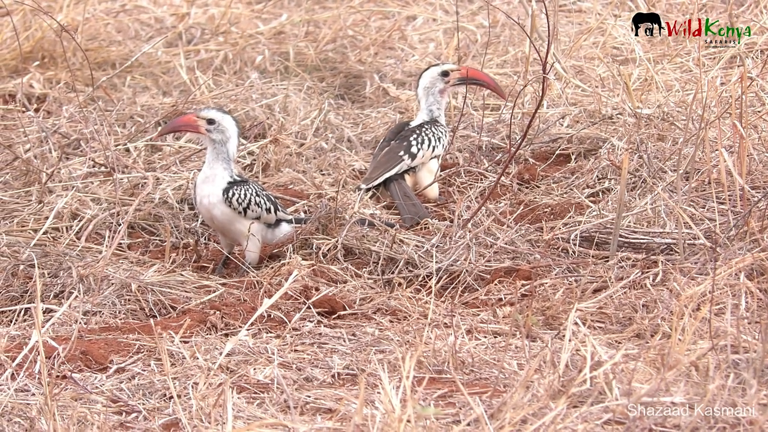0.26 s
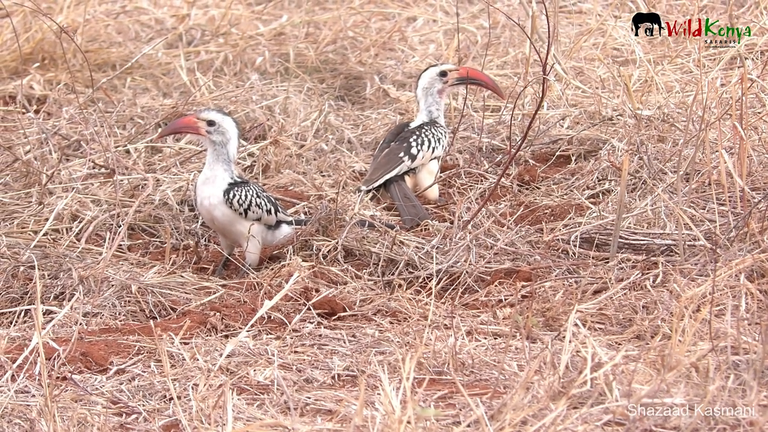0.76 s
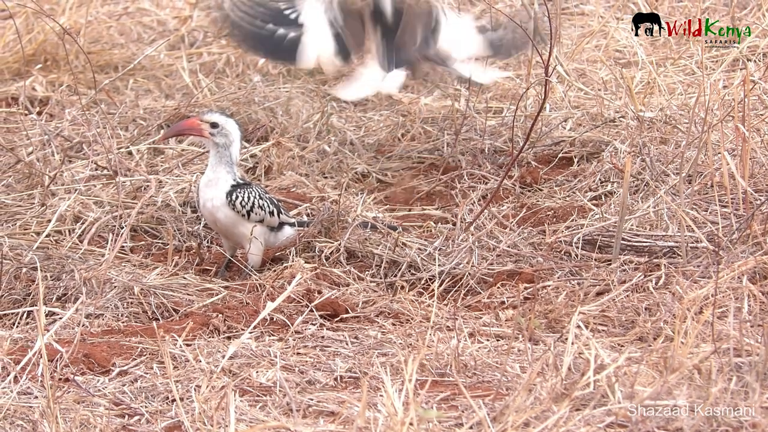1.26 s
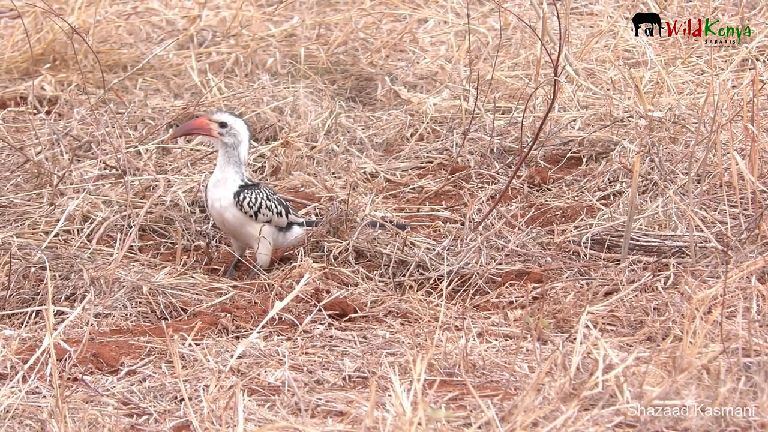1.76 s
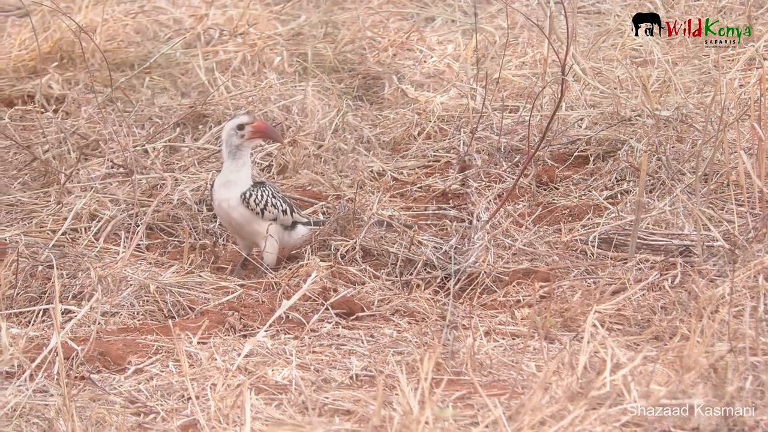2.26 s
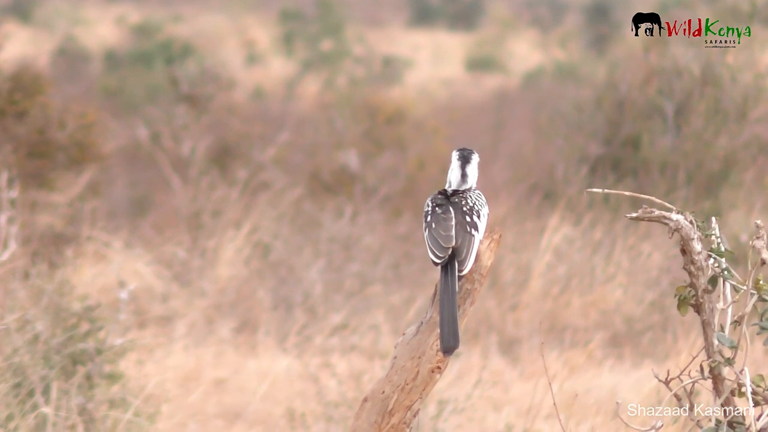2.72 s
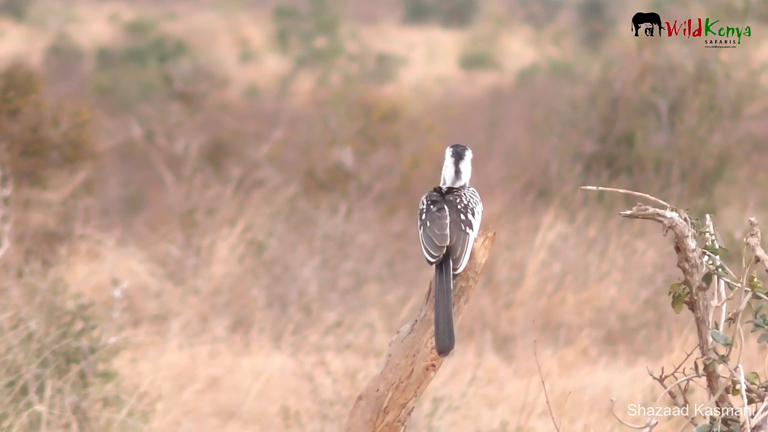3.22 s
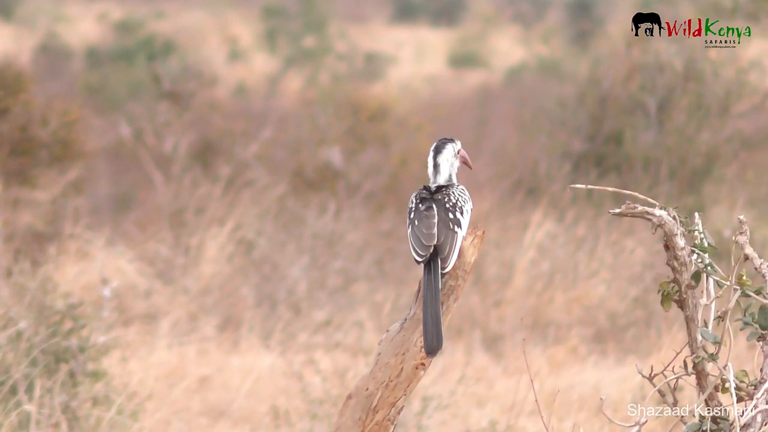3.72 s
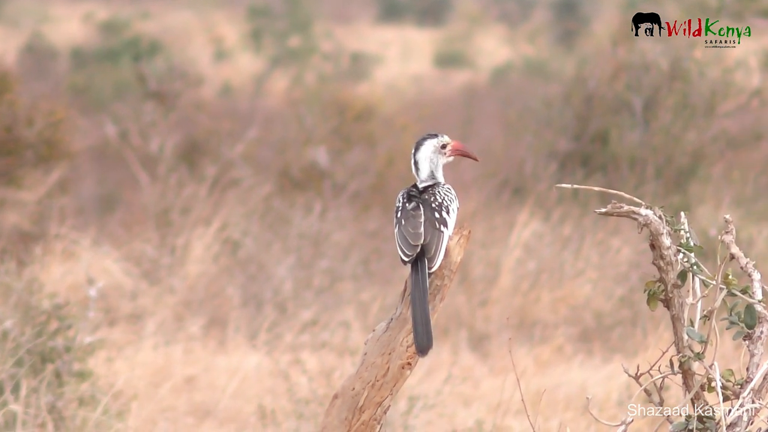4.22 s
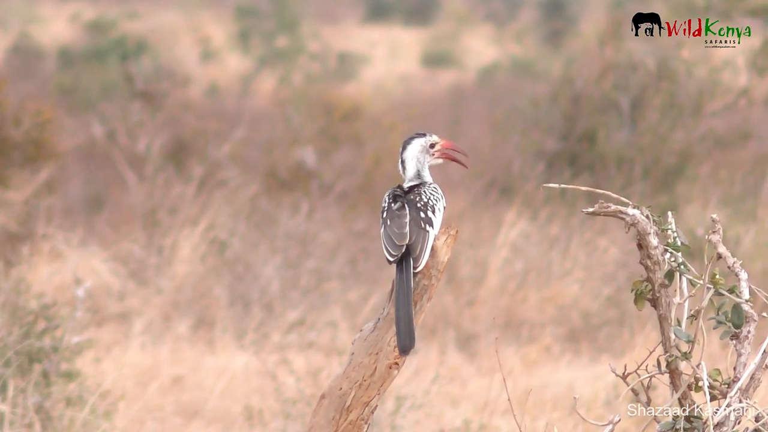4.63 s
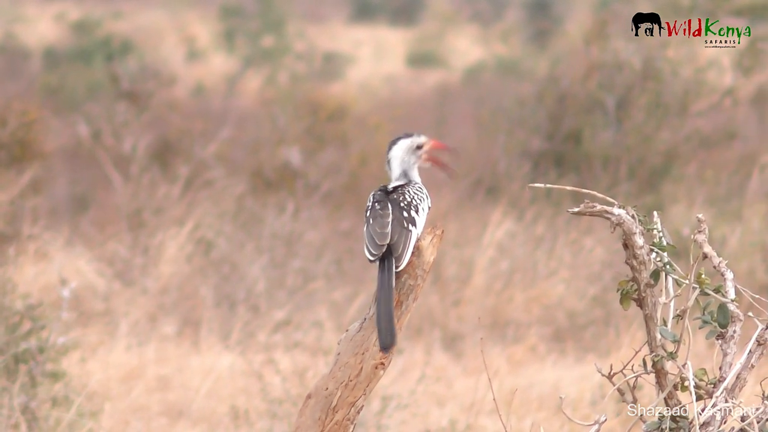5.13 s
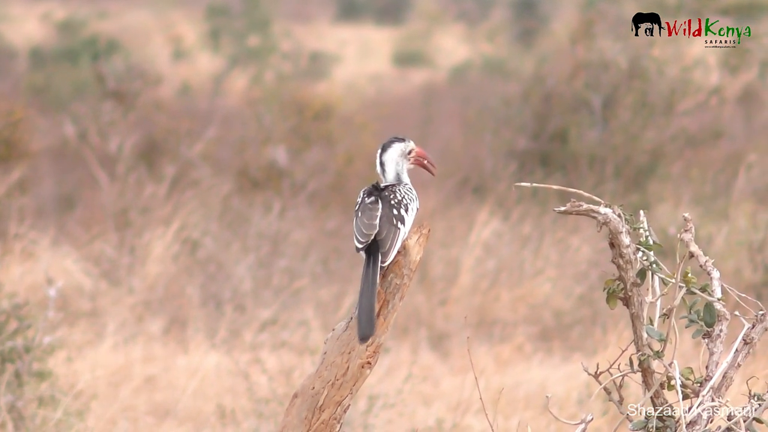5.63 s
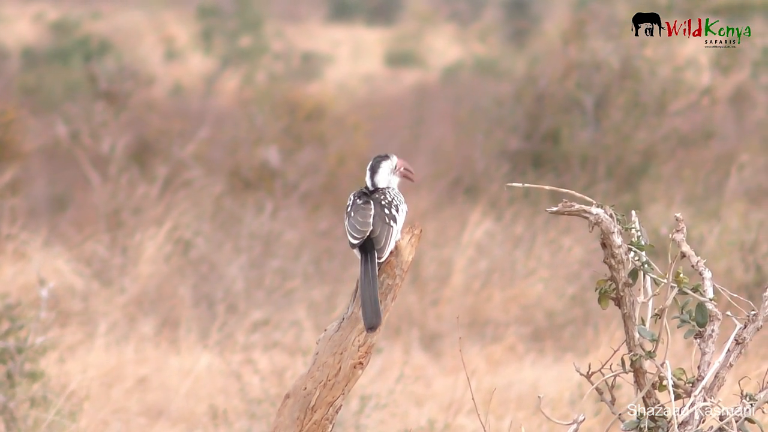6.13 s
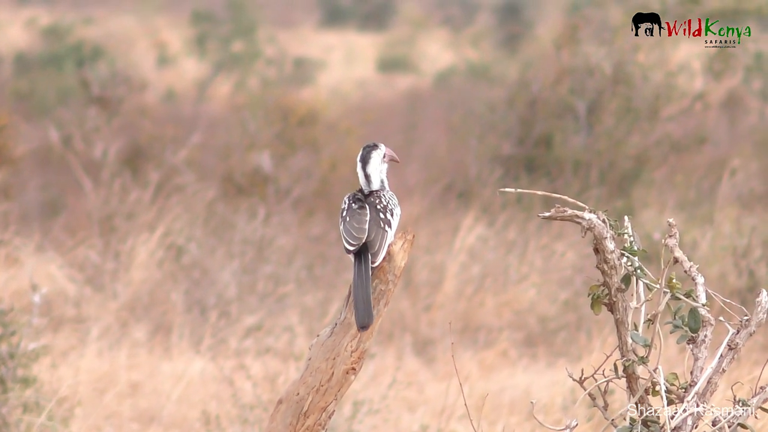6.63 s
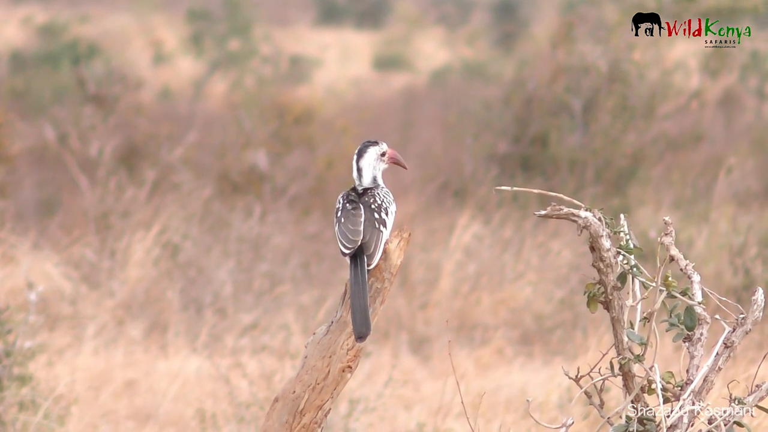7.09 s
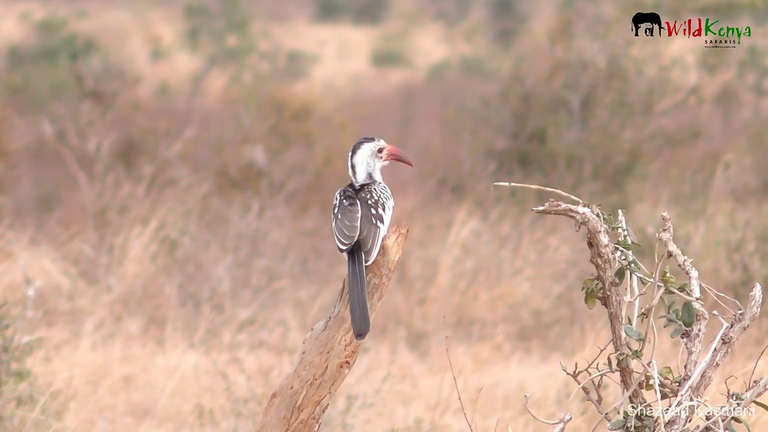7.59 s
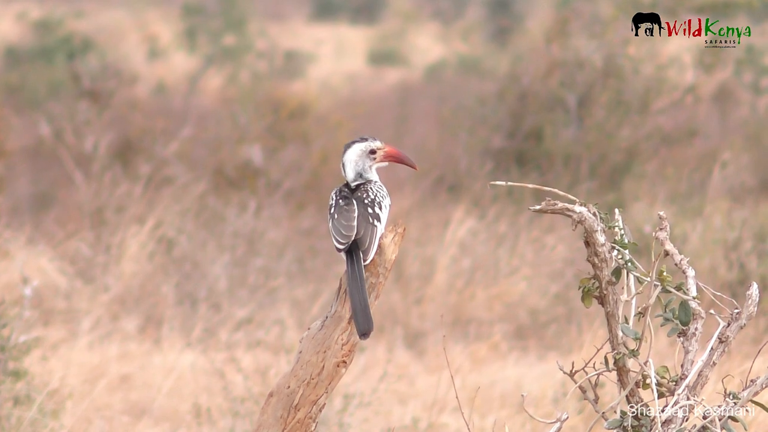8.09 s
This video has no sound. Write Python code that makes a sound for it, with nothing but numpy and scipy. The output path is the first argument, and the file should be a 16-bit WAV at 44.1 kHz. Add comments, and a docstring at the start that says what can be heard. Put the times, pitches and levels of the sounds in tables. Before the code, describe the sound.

A large-billed bird calls close and central in open dry bush, its hoarse gliding notes briefly echoed by grass and twigs. A trilled squawk and drawn-out rasp lead to dense cackling chatter with high squeaks, ending suddenly past the middle. Then it is sparse: gentle drooping peeps, far whistles, a low distant honk, and a single late squawk. Wind rumbles and buffets the microphone throughout, strongest early.

```python
"""Wind buffets the microphone throughout, over a low rush and a faint hiss, and thin whistles come from afar.
Close by in dry savanna bush a bird chatters a fast run of harsh, swooping, trilled notes and stops;
soft peeps follow, and one more falling call; another distant bird honks twice. Voices are gliding harmonics
coloured by the beak, roughened by noise; the two sides of the syrinx sometimes sound at once.
Wind and air are coloured noise with moving levels; grass and scrub scatter a short echo of the birds."""
import sys
import numpy as np
from scipy import signal
from scipy.fft import rfft, irfft
from scipy.io import wavfile
from scipy.ndimage import uniform_filter1d, minimum_filter1d

SR = 44100
rng = np.random.default_rng(int(sys.argv[2]) if len(sys.argv) > 2 else 0)


def int16_out(signal):
    """Quantize to a 16-bit WAV file."""
    q = np.round(np.clip(np.atleast_2d(signal).T, -1, 1) * 32767)
    wavfile.write(sys.argv[1], SR, q.astype(np.int16))


N = 368468
TIME = np.arange(N) / SR
BIN_HZ = np.arange(N // 2 + 1) * SR / N
SIDES = np.array([[1], [-1]])  # opposite sign left and right
TOP_HZ = 15750  # nothing is kept above this

# What throat and beak let through: (frequency [Hz], gain [dB])
BEAK = [(600, -16), (850, -8.5), (1200, -8), (1600, -5), (2200, -1), (5500, -1), (7000, -12), (8000, -19),
        (9500, -26.5), (14000, -31.5), (16000, -56)]


def undb(db):
    """Decibels to gain."""
    return 10 ** (np.asarray(db) / 20)


def curves(rows):
    """Each column of a table, joined by straight lines in time."""
    s, *columns = np.transpose(rows)
    return [np.interp(TIME, s, column) for column in columns]


def gain_at(hz, colour):
    """Gain of a short spectrum at the given frequencies, joined along log frequency."""
    points, db = np.transpose(colour)
    return undb(np.interp(np.log(np.maximum(hz, 1)), np.log(points), db))


def noise(colour):
    """Coloured noise of unit power."""
    y = irfft(rfft(rng.standard_normal(N)) * gain_at(BIN_HZ, colour), N)
    return y / y.std()


def walk(rate):
    """Smooth chance of unit spread that changes about rate times a second."""
    size = max(int(SR / rate), 1)
    steps = np.repeat(rng.standard_normal(N // size + 1), size)[:N]
    y = uniform_filter1d(steps, size)
    return y / y.std()


def steady(y, seconds):
    """Noise with its slow swings of level evened out."""
    power = uniform_filter1d(y ** 2, int(seconds * SR))
    return y / np.sqrt(power + 1e-6)


def wind(swell_gain_db=1.0):
    """Eddies press on the microphone: slow swells and quicker buffets, both lifted by gusts."""
    # Wind at the microphone before gusts and trims: (time [s], pressure swell [dB], buffeting [dB])
    wind_levels = [(0, -13, -30.5), (.24, -17, -29), (.32, -3.5, -21), (.55, -14, -23), (.75, -15, -32),
                   (.86, -9, -21.5), (1.2, -13, -32), (1.6, -16.5, -31), (2.35, -16, -31),
                   (2.75, -15.5, -31), (3.0, -21.5, -38), (3.4, -18, -43.5), (3.7, -19, -28.5),
                   (4.5, -17.5, -32.5), (5.25, -21, -38.5), (5.85, -20.5, -34.5), (6.35, -24, -39.5),
                   (6.8, -17, -35), (7.55, -20, -34.5), (7.9, -15, -36), (8.36, -20, -32)]
    # Single gusts on top: (time of crest [s], half width at 1/e of the dB rise [s], rise of the buffeting [dB])
    gusts = [(.53, 0.046, 9), (.88, 0.069, 7), (1.29, 0.035, 11), (2.4, .04, 3), (2.57, .035, 3),
             (3.52, 0.048, 13), (5.78, 0.037, 12), (5.96, 0.041, 15.5), (7.25, .07, 9),
             (7.686, 0.011, 15.5), (7.79, 0.031, 17.5)]
    # Spectra of the slow swell and the quicker buffets: (frequency [Hz], relative level [dB])
    swell_colour = [(3, -14), (8, -1), (14, 2), (25, 1), (40, -8.5), (60, -14.5), (90, -34.5), (200, -106)]
    buffet_colour = [(35, -17.5), (62, 2.5), (80, 0), (120, -11), (200, -23), (400, -47.5), (1000, -78)]
    gust_swell = 0.38  # share of a gust's rise that the slow pressure follows

    swell_db, buffet_db = curves(wind_levels)
    gust_db = sum(db * np.exp(-((TIME - s) / width) ** 2) for s, width, db in gusts)
    swell = steady(steady(noise(swell_colour), 0.1056), 0.0686)
    swell = swell * undb(swell_db + gust_swell * gust_db + swell_gain_db)
    buffets = steady(noise(buffet_colour), 0.0497)
    buffets = buffets * undb(buffet_db + gust_db + 3.1 * walk(14))
    return swell + buffets


def air(rush_gain_db=3, hiss_gain_db=4.0, side_db=-5):
    """A low rush over the plain and a thin hiss that differs a little between the channels."""
    # Background before the two gains: (time [s], low rush [dB], hiss [dB])
    air_levels = [(0, -46, -60), (.45, -45.5, -60), (1.35, -51.5, -68), (2.0, -53, -70), (3.3, -54, -71),
                  (4.6, -53, -70), (5.3, -54, -70.5), (6.1, -55.5, -71.5), (6.6, -54, -70.5),
                  (7.2, -51, -69), (7.9, -48.5, -65), (8.36, -47.5, -63)]
    # Spectra of rush and hiss: (frequency [Hz], relative level [dB])
    rush_colour = [(100, -11.5), (250, 1), (400, -2.5), (700, -8.5), (1200, -16), (2500, -23.5),
                   (5000, -30), (10000, -105)]
    hiss_colour = [(500, 4), (2000, -2.5), (4000, 6), (8000, 6), (12000, 3), (15500, 0)]

    rush_db, hiss_db = curves(air_levels)
    rush = noise(rush_colour) * undb(rush_db + rush_gain_db + 0.86 * walk(14))
    hiss = noise(hiss_colour) + undb(side_db) * noise(hiss_colour) * SIDES
    return rush + hiss * undb(hiss_db + hiss_gain_db)


def trill():
    """Factor on the pitch: the syrinx flutters, starting from a crest."""
    # Fast pitch trills: (start [s], end [s], rate [Hz], depth [share of the pitch])
    trills = [(0.124, 0.202, 74, 0.16), (0.8362, 0.918, 64.9, 0.071), (0.947, 1.291, 72.3, 0.069),
              (1.563, 1.605, 122.6, 0.14), (2.199, 2.292, 96.3, 0.076), (2.758, 2.789, 81.7, 0.21),
              (2.797, 2.87, 59.4, 0.12), (3.368, 3.413, 84.3, 0.13), (3.416, 3.488, 62, 0.14),
              (4.699, 4.727, 87, 0.15), (4.735, 4.819, 67.8, 0.11), (7.584, 7.677, 66.5, 0.07)]
    edge = .004  # s, fade at either end of a trill

    factor = np.ones(N)
    for start, end, rate, depth in trills:
        gate = np.interp(TIME, [start - edge, start, end - edge, end], [0, 1, 1, 0])
        factor += depth * gate * np.cos(2 * np.pi * rate * (TIME - start))
    return factor


def note(rows, bend, flutter, muffle_db=0, fall_db=10, first_db=0, count=9):
    """One note from rows of (s, pitch Hz, level dB): the harmonics of a gliding membrane, coloured by the beak."""
    pure_above_hz, pure_db_per_octave = 2480, 11  # high notes lean on their fundamental
    muffle_above_hz = 2230  # a half-closed beak damps what lies above
    lead_s = .003  # the note starts to sound this long before its contour
    attack_s, release_s = 0.0045, 0.0028

    s, *columns = np.transpose(rows)
    span = slice(max(int((s.min() - lead_s) * SR), 0), int((s.max() + release_s) * SR))
    t = TIME[span]
    hz, db = (np.interp(t, s, column) for column in columns)
    hz = hz * bend[span]
    k = np.arange(1, count + 1)[:, None]  # harmonic numbers

    pure_db = first_db + pure_db_per_octave * np.log2(np.maximum(hz / pure_above_hz, 1))
    source_db = np.where(k == 1, pure_db, -fall_db * np.log2(k / 2))
    damping_db = muffle_db * np.log2(np.maximum(k * hz / muffle_above_hz, 1))
    weight = undb(source_db - damping_db) * gain_at(k * hz, BEAK) * (k * hz < TOP_HZ)
    # colour changes only the balance: the tone keeps unit power
    weight *= np.sqrt(2 / np.sum(weight ** 2, axis=0))

    gate = np.clip(np.minimum((t - t[0]) / attack_s, (t[-1] - t) / release_s), 0, 1)
    phase = 2 * np.pi * np.cumsum(hz) / SR
    tone = np.sum(weight * np.sin(k * phase), axis=0)
    out = np.zeros(N)
    out[span] = tone * gate * undb(db) * flutter[span]
    return out


def hoarse(tone, spread_hz=900):
    """Turbulence in the syrinx smears each harmonic into a band of noise, most around the beak's pass band."""
    lowpass = signal.butter(2, spread_hz, fs=SR, output="sos")
    eddies = signal.sosfilt(lowpass, rng.standard_normal(N))
    smeared = tone * eddies / eddies.std()
    return irfft(rfft(smeared) * gain_at(BIN_HZ, BEAK), N)


def scrub(x, near_db=-13.0, near_t60=0.23, far_db=-27, far_t60=0.68):
    """Ground and twigs scatter the sound at once; farther bushes add a thin, duller tail."""
    t = TIME[:SR]
    near, far = rng.standard_normal((2, SR))
    near = near * undb(-60 * t / near_t60) * (t > .002)
    far = far * undb(-60 * t / far_t60) * (t > .02)
    far = signal.sosfilt(signal.butter(2, 5500, fs=SR, output="sos"), far)
    response = undb(near_db) * near / np.linalg.norm(near) + undb(far_db) * far / np.linalg.norm(far)
    return signal.fftconvolve(x, response)[:N]


def whistles(bend, first_db=24, edge_db=-5, scatter_db=2):
    """Distant birds: plain glides that swell, fade and blur in the bushes."""
    # Thin whistles from deeper in the bush, level at mid-glide before flutter, blur and echo:
    # (start [s], length [s], first pitch [Hz], last pitch [Hz], level [dB])
    glides = [(.078, .014, 3800, 2600, -53), (.116, .035, 3150, 4020, -56),
              (0.164, 0.049, 3900, 3230, -56.5), (4.222, 0.048, 2820, 2790, -47.5),
              (5.087, 0.23, 3200, 4020, -68), (5.126, 0.14, 2310, 2450, -67),
              (5.267, 0.1, 3020, 2910, -56.5), (5.386, 0.021, 3580, 2740, -55.5),
              (5.481, 0.059, 2800, 2754, -52.5), (5.552, .014, 3300, 2800, -57),
              (5.983, .02, 3050, 3550, -59), (5.785, .025, 2700, 2780, -60), (5.817, .025, 2870, 2980, -57),
              (5.86, .05, 3060, 2983, -59.5), (6.005, 0.063, 3030, 2990, -56),
              (6.074, 0.076, 2980, 2920, -63.5), (6.545, .04, 4100, 3000, -53),
              (6.58, 0.089, 2400, 2020, -63), (6.633, 0.039, 3870, 3320, -57),
              (6.685, .025, 3200, 3780, -59), (6.76, 0.062, 2990, 2980, -59),
              (7.244, 0.19, 1450, 2150, -64.5), (7.27, .07, 3100, 3270, -65),
              (7.383, 0.025, 3100, 3600, -60), (7.414, 0.078, 3010, 2970, -55),
              (7.662, 0.037, 2810, 2810, -42.5), (7.737, 0.011, 3300, 2600, -47),
              (8.11, .09, 2550, 2650, -65)]
    blur = .35  # share of smeared tone

    shaken = bend * (1 + 0.0075 * walk(350))
    flutter = undb(2.1 * walk(120))
    out = np.zeros(N)
    for start, length, hz0, hz1, db in glides:
        glide = [
            (start, hz0, db + edge_db),
            (start + length / 2, (hz0 + hz1) / 2, db),
            (start + length, hz1, db + edge_db),
        ]
        out += note(glide, shaken, flutter, first_db=first_db)
    out = out + blur * hoarse(out, spread_hz=720)
    return out + undb(scatter_db) * scrub(out)


def progress(count=25):
    """Even steps through a note, from 0 to 1."""
    return np.linspace(0, 1, count)


def yelp(start, length, first_hz, last_hz, db, fade_db):
    """The membrane slackens: its period lengthens almost evenly with time as the voice fades."""
    curve = 1.1  # 1 would be perfectly even
    u = progress()
    period = 1 / first_hz + (1 / last_hz - 1 / first_hz) * u ** curve
    return np.column_stack([start + length * u, 1 / period, db - fade_db * u])


def squeak(start, length, hz, db):
    """The taut membrane scoops up towards its top pitch."""
    scoop, scoop_s = 0.064, 0.003  # starts this share flat, slides up with this time constant
    t = length * progress()
    pitch = hz * (1 - scoop * np.exp(-t / scoop_s))
    return np.column_stack([start + t, pitch, np.full_like(t, db)])


def chatter(bend, shimmer_db=2.06, surge_db=1.86, level_db=-1.0, squeak_first_db=-7, throb_db=14):
    """The loud notes; pitch and strength shake quickly; trills throb, and the deepest are the harshest."""
    # All levels here stand before flutter, the trim level_db and hoarseness.
    # Squawks: (muffling by the beak [dB per octave], below 0 when wide open; overtone fall [dB per octave];
    # contour of (time [s], pitch [Hz], level [dB]))
    squawks = [ (31, 4.1, [(.832, 3270, -30), (.84, 2640, -21.5), (.85, 2500, -20), (.86, 2050, -19.5),
               (.88, 1687, -24.5), (.899, 1280, -28), (.917, 1083, -25), (.935, 1147, -28),
               (.947, 814, -35)]), (32, 14, [(1.294, 1065, -39), (1.304, 1760, -39), (1.313, 1970, -38),
               (1.325, 1960, -43)]), (14, 8.8, [(1.384, 932, -39), (1.396, 1322, -34), (1.404, 2255, -36),
               (1.422, 1307, -34), (1.436, 1018, -31.5), (1.446, 1065, -37)]),
               (-1.5, 2.8, [(1.559, 3295, -23.5), (1.58, 2245, -22.5), (1.599, 1396, -25),
               (1.609, 1184, -27), (1.627, 1189, -28), (1.637, 1766, -24), (1.65, 2200, -27),
               (1.659, 1452, -23), (1.692, 857, -33)]), (1, 12.3, [(1.783, 1410, -49), (1.793, 1830, -35),
               (1.801, 1975, -30.5), (1.833, 1664, -31.5), (1.85, 2040, -25.5), (1.865, 3430, -31.5),
               (1.876, 2600, -26), (1.89, 2498, -24), (1.915, 2380, -37), (1.941, 2340, -45)]),
               (-6, 13, [(2.008, 3730, -26), (2.012, 5560, -20.5), (2.016, 6970, -42), (2.033, 6820, -37.5),
               (2.041, 5730, -38)]), (-1.5, 14.5, [(2.169, 2750, -30), (2.177, 2410, -25.5),
               (2.186, 1357, -27), (2.196, 1208, -28.5), (2.262, 1436, -29), (2.287, 1378, -26),
               (2.306, 1047, -30.5), (2.346, 1500, -25.5), (2.368, 790, -38)]),
               (-1.5, 14, [(2.415, 2490, -28), (2.444, 2730, -24.5), (2.456, 2220, -25)]),
               (14, 6.6, [(2.457, 3120, -29.5), (2.476, 2680, -27), (2.491, 2370, -23.5),
               (2.501, 1990, -29), (2.516, 1730, -28.5), (2.534, 1190, -52)]),
               (-2, 7.3, [(2.535, 2060, -23), (2.547, 2460, -21), (2.553, 4540, -28), (2.562, 4430, -34)]),
               (-2, 8.8, [(2.553, 1497, -42), (2.57, 1197, -42), (2.585, 1114, -40), (2.592, 2160, -26),
               (2.597, 4000, -28)]), (0, 5, [(2.734, 4300, -31.5), (2.744, 2766, -22), (2.753, 1490, -29.5),
               (2.788, 1752, -32), (2.795, 2275, -21), (2.803, 1947, -34), (2.815, 2670, -27.5),
               (2.843, 2660, -28), (2.85, 1733, -26), (2.879, 2230, -41)]), (5, 6.5, [(2.884, 795, -38),
               (2.9, 1170, -35), (2.916, 1660, -33.5), (2.927, 1775, -26.5), (2.933, 1206, -35),
               (2.944, 1082, -27), (2.957, 861, -39.5), (2.985, 828, -45)]), (0, 14, [(2.985, 1000, -34),
               (3.0, 1300, -30.5), (3.013, 1420, -34), (3.03, 1520, -27.5), (3.046, 1273, -28)]),
               (13, 14, [(2.992, 3600, -33), (3.002, 3950, -30.5), (3.028, 4550, -24.5), (3.04, 4250, -32),
               (3.047, 3860, -23.5), (3.057, 4134, -26), (3.069, 4340, -32), (3.086, 4120, -30)]),
               (0.5, 5.3, [(3.094, 1582, -30), (3.107, 1310, -33.5), (3.116, 2550, -31),
               (3.128, 2580, -32)]), (-1, 5.3, [(3.183, 5470, -35), (3.189, 4560, -26), (3.2, 3850, -32),
               (3.207, 2710, -38), (3.219, 2504, -25), (3.232, 2680, -37)]), (4, 10, [(3.228, 3760, -31),
               (3.249, 3580, -35)]), (-1, 6, [(3.352, 4220, -29), (3.36, 3380, -21.5), (3.369, 2794, -32),
               (3.38, 2630, -23), (3.386, 2400, -31), (3.394, 2966, -24.5), (3.404, 2880, -27),
               (3.418, 3200, -25.5), (3.433, 3580, -30)]), (20, 16, [(3.434, 3460, -27), (3.453, 3750, -33),
               (3.462, 3530, -21), (3.47, 3236, -32), (3.483, 3186, -31), (3.495, 2120, -37),
               (3.506, 1777, -34), (3.522, 1825, -35)]), (21, 14, [(3.527, 1064, -38), (3.535, 2040, -30.5),
               (3.542, 2800, -31), (3.555, 3070, -33.5), (3.563, 3130, -29)]), (25, 12, [(3.626, 3375, -29),
               (3.631, 2950, -27), (3.636, 2344, -29), (3.642, 2620, -25), (3.649, 1897, -29.5),
               (3.674, 1620, -31), (3.686, 1210, -27)]), (-4.5, 21, [(3.63, 2130, -31), (3.647, 2283, -30),
               (3.666, 2350, -25.5), (3.683, 2150, -34), (3.697, 2160, -32), (3.713, 2270, -29),
               (3.721, 2620, -29)]), (0, 11, [(3.692, 1256, -32), (3.715, 1026, -35), (3.729, 1124, -35),
               (3.743, 845, -43)]), (-2, 1.7, [(3.807, 1585, -33), (3.816, 2450, -25), (3.822, 3610, -37)]),
               (-1.5, 0.94, [(3.982, 4200, -35), (3.989, 3350, -29.5), (4.002, 2790, -24),
               (4.009, 2150, -33), (4.013, 2760, -28.5), (4.023, 2450, -29), (4.039, 2065, -33.5),
               (4.048, 3110, -25), (4.054, 2360, -32)]), (-0.5, 2.1, [(4.055, 1264, -27.5),
               (4.064, 1403, -29.5), (4.075, 2427, -31), (4.089, 2694, -25.5), (4.104, 3333, -33),
               (4.115, 2066, -28.5), (4.126, 1550, -30), (4.15, 1136, -34), (4.163, 850, -39)]),
               (1.5, 11.6, [(4.281, 966, -39), (4.302, 1275, -28), (4.314, 1337, -30), (4.32, 1650, -28),
               (4.326, 3030, -39)]), (1, 14, [(4.327, 3840, -36), (4.342, 3920, -28), (4.357, 4200, -44),
               (4.365, 4210, -36)]), (0.5, 8, [(4.369, 3450, -34), (4.377, 1717, -26), (4.388, 1426, -29.5),
               (4.395, 1560, -30.5), (4.401, 2100, -32), (4.413, 2560, -36)]),
               (-1, 14, [(4.471, 5200, -29.5), (4.486, 4090, -33), (4.5, 2800, -38.5), (4.508, 2460, -26),
               (4.524, 2650, -37)]), (4, 10, [(4.519, 3430, -36), (4.546, 3510, -37)]),
               (1.5, 3.1, [(4.668, 3910, -25), (4.676, 3200, -27.5), (4.687, 2650, -23),
               (4.693, 2174, -28.5), (4.725, 2196, -30), (4.734, 2890, -24), (4.768, 3140, -26),
               (4.78, 2590, -39)]), (28, 10, [(4.778, 2720, -21.5), (4.799, 3020, -29),
               (4.811, 2530, -26.5), (4.824, 1970, -36), (4.836, 1540, -49)]), (23, 16, [(4.852, 1142, -37),
               (4.862, 1883, -37.5), (4.872, 2580, -27.5), (4.879, 3006, -29), (4.885, 2080, -26)]),
               (29, 11, [(7.578, 3146, -36), (7.587, 2610, -25), (7.603, 2300, -25.5), (7.609, 1797, -28),
               (7.623, 1780, -30), (7.636, 1390, -41), (7.66, 1080, -32), (7.681, 1168, -39),
               (7.693, 876, -42)]), ]
    # Falling yelps: (start [s], length [s], first pitch [Hz], last pitch [Hz], level [dB], fade [dB],
    # muffling [dB per octave], overtone fall [dB per octave])
    yelps = [ (1.349, 0.016, 1760, 804, -35.5, -2, 30, 4), (1.449, 0.035, 2100, 775, -32.5, 5, 18, 7),
             (1.957, .016, 6360, 1800, -25, 5.5, -2, 8), (2.042, 0.065, 4600, 1036, -29, 11.5, 12, 16),
             (2.596, 0.074, 4560, 1046, -22, 18, 10, 27), (3.05, 0.034, 4380, 1576, -26.5, 13, 8, 6),
             (3.084, .009, 5630, 2540, -29.5, 1, 2, 10), (3.247, .034, 3620, 832, -31, 8.5, 16, 0),
             (3.566, .042, 1334, 718, -28, 11.5, 3.5, 5), (3.733, 0.011, 3710, 1960, -23.5, 5.5, 2, -4),
             (3.827, 0.061, 3635, 877, -25.5, 10.5, 0.5, 17), (4.548, 0.031, 2910, 805, -32.5, 9.5, 21, 11),
             (4.888, 0.053, 1203, 761, -31.5, 16.5, 1.5, 7), ]
    # Squeaks at the top of the voice: (start [s], length [s], top pitch [Hz], level [dB])
    squeaks = [(2.502, 0.0076, 6900, -28), (2.547, 0.04, 6590, -31), (3.129, 0.0077, 7240, -29),
               (3.158, 0.0071, 6920, -32.5), (3.137, .02, 7040, -50), (3.179, .009, 6790, -38),
               (3.753, .01, 6970, -35), (3.767, .023, 6740, -52), (3.785, 0.025, 6930, -32),
               (4.409, 0.034, 6970, -43), (4.451, 0.011, 6930, -34)]
    jitter, wobble = .01, .009  # quick and slower shake, shares of the pitch
    calm, harsh = .15, 6  # hoarseness without a trill, and its growth with trill power

    shaken = bend * (1 + jitter * walk(1400) + wobble * walk(220))
    throb = throb_db * (bend - 1)
    flutter = undb(level_db + shimmer_db * walk(900) + surge_db * walk(170) + throb)
    tone = sum(note(rows, shaken, flutter, muffle, fall) for muffle, fall, rows in squawks)
    tone += sum(note(yelp(*shape), shaken, flutter, muffle, fall) for *shape, muffle, fall in yelps)
    tone += sum(note(squeak(*row), shaken, flutter, first_db=squeak_first_db) for row in squeaks)
    trill_power = uniform_filter1d((bend - 1) ** 2, size=SR // 80)
    return tone + (calm + harsh * trill_power) * hoarse(tone)


def small_sounds():
    """Dry ticks, noise bursts that die within milliseconds, and a brief dull rustle of noise."""
    # Dry ticks: (time [s], level [dB], decay time constant [s])
    tick_rows = [(0.9052, -27, 0.00083), (2.4138, -10, 0.0011)]
    # A dull rustle: (time [s], level [dB])
    rustle_rows = [(2.5, -71), (2.535, -36), (2.56, -28.5), (2.585, -42), (2.62, -74)]
    # spectra of both: (frequency [Hz], relative level [dB])
    tick_colour = [(100, 21), (2000, -25.0), (6000, -10.0), (15000, -47.0)]
    rustle_colour = [(100, 21), (250, 9), (900, -0.5), (2500, 1.5), (8000, -45)]

    snap = sum(undb(db) * np.exp(-np.abs(TIME - s) / ring) * (TIME >= s) for s, db, ring in tick_rows)
    ticks = snap * steady(noise(tick_colour), 0.0018)
    rustle_db, = curves(rustle_rows)
    return ticks + undb(rustle_db) * noise(rustle_colour)


def rasp(bend, throb_db=42, level_db=-3):
    """A slack membrane beats unevenly and throbs with the trill, part tone and part turbulence."""
    # The drawn-out rasp after the first call, before throb and trims: (time [s], pitch [Hz], level [dB])
    contour = [(.95, 739, -47.5), (1.054, 737, -49), (1.15, 850, -44), (1.215, 884, -39.5),
               (1.24, 958, -35.5), (1.282, 993, -37), (1.299, 830, -47)]
    jitter, reflection, rough = .04, .5, .5  # shares of pitch, returned wave and turbulence
    pipe_hz = 970

    flutter = undb(level_db + throb_db * (bend - 1) + 2.2 * walk(900))
    shaken = bend * (1 + jitter * walk(1500))
    tone = note(contour, shaken, flutter, muffle_db=1, fall_db=8, first_db=1)
    # the windpipe returns the wave inverted, half a pipe cycle late: odd multiples of pipe_hz gain
    tone = tone - reflection * np.interp(TIME - .5 / pipe_hz, TIME, tone)
    # the nearly closed beak cuts the top
    beak_cut = signal.cheby1(4, 2, 5400, fs=SR, output="sos")
    return signal.sosfilt(beak_cut, tone + rough * hoarse(tone)) * undb(4)


def far_bird():
    """A low nasal honk, far off; only the harmonics in its throat resonance carry this far."""
    # Two nasal calls, level before the throat: lists of (time [s], pitch [Hz], level [dB])
    calls = [
        [(4.58, 172.3, -59), (4.64, 178, -54), (4.69, 189, -51.5), (4.78, 171, -57)],
        [(5.45, 177, -63), (5.55, 186.5, -55.5), (5.63, 175, -57.5), (5.74, 165, -62)],
    ]
    # Throat resonance: (frequency [Hz], gain [dB])
    throat = [(180, -29), (370, -5), (550, 2), (730, -1.5), (920, 0.5), (1100, -11), (1600, -16)]

    out = np.zeros(N)
    k = np.arange(1, 9)[:, None]  # harmonic numbers
    waver = 1 + 0.011 * walk(60)
    for rows in calls:
        hz, db = curves(rows)
        on = (TIME > rows[0][0]) & (TIME < rows[-1][0])
        hz = (hz * waver)[on]
        phase = 2 * np.pi * np.cumsum(hz) / SR
        honk = np.sum(gain_at(k * hz, throat) * np.sin(k * phase), axis=0)
        out[on] += undb(db[on]) * honk
    return out


PEEP_EDGE_DB = -4  # level by which both ends of a peep droop


def arch(start, length, hz, slide, db):
    """A sliding peep whose pitch and level droop at both ends."""
    pitch_droop = 0.044  # share of the pitch
    u = progress()
    droop = (2 * u - 1) ** 2
    pitch = hz * (1 + slide * (u - .5) - pitch_droop * droop)
    return np.column_stack([start + length * u, pitch, db + PEEP_EDGE_DB * droop])


def peeps(first_db=20, fall_db=18):
    """Soft, nearly pure peeps; the voice catches and turns bright on the way in and out."""
    # Soft arched peeps, level at mid-peep before flutter and echo:
    # (start [s], length [s], pitch [Hz], slide [share of the pitch], level [dB])
    peep_rows = [(5.032, 0.069, 2600, 0.031, -62), (5.581, 0.027, 2505, -0.15, -53),
                 (5.708, 0.022, 2690, .06, -53), (5.742, 0.029, 2596, -0.11, -51.5),
                 (6.226, 0.053, 2805, 0.051, -49), (6.309, 0.013, 2740, -0.077, -51),
                 (6.33, 0.026, 2485, -0.12, -46), (6.457, .024, 2700, 0.087, -46.5),
                 (6.496, 0.024, 2535, -0.24, -46), (6.752, 0.042, 2724, -0.044, -45),
                 (6.947, 0.05, 2810, -0.055, -47), (7.03, 0.0098, 2750, -0.14, -45),
                 (7.04, .038, 2580, -0.167, -42.5), (7.188, 0.022, 2700, 0.067, -44.5),
                 (7.224, 0.022, 2570, -.18, -44.5), (7.469, 0.028, 2740, 0.0082, -45.5),
                 (7.758, 0.036, 2520, -0.2, -52), (7.902, 0.022, 2710, 0.043, -46),
                 (7.934, 0.02, 2560, -.16, -44.5)]
    waver, scatter, rough = .009, .5, .8  # shares of pitch, echo and turbulence
    # the voice flicks into and out of a peep, between these shares of its pitch
    catch_s, catch_db, catch_low, catch_high = .014, -13.5, .62, .84

    shaken = 1 + waver * walk(350)
    flutter = undb(2 * walk(160))
    out, catches = np.zeros((2, N))
    for start, length, hz, slide, db in peep_rows:
        out += note(arch(start, length, hz, slide, db), shaken, flutter, fall_db=fall_db, first_db=first_db)
        for edge, away in ((start, -catch_s), (start + length, catch_s)):
            flick = [
                (edge, catch_high * hz, db + catch_db),
                (edge + away, catch_low * hz, db + catch_db + PEEP_EDGE_DB),
            ]
            catches += note(sorted(flick), shaken, flutter, fall_db=fall_db, first_db=1.5)
    out += catches + rough * hoarse(catches, spread_hz=590)
    # from further off, more of the sound comes by way of the bushes
    return out + scatter * scrub(out)


def twigs(x):
    """Branches right beside the perch return faint copies within a few milliseconds."""
    share, first, last, count = .3, .001, .014, 14  # level, delays in s, number of copies
    response = np.zeros(int(last * SR) + 1)
    delays = (rng.uniform(first, last, count) * SR).astype(int)
    response[delays] = rng.choice([-1, 1], count) / np.sqrt(count)
    return share * signal.fftconvolve(x, response)[:N]


def fizz(voice, fizz_db=-27, side_db=-7):
    """Air through the open beak adds a faint sizzle that follows the bright part of the voice."""
    highpass = signal.butter(2, 4500, "highpass", fs=SR, output="sos")
    bright = signal.sosfilt(highpass, voice)
    effort = np.sqrt(np.abs(uniform_filter1d(bright ** 2, size=SR // 100)))
    # (frequency [Hz], relative level [dB])
    colour = [(3000, -21), (6000, 3.5), (8000, -2.0), (9500, -3.5), (11000, -2), (13500, -39), (15500, -23)]
    sizzle = noise(colour) + undb(side_db) * noise(colour) * SIDES
    return sizzle * effort * undb(fizz_db + 6.3 * walk(30))


def scene():
    """The birds stand straight ahead of the microphone; only their sizzle and echo have a trace of width."""
    bend = trill()
    birds = whistles(bend) + chatter(bend) + rasp(bend) + far_bird() + peeps()
    birds = birds + twigs(birds)
    width = undb(-19.0) * scrub(birds) * SIDES
    return wind() + air() + birds + fizz(birds) + scrub(birds) + width + small_sounds()


def record(dry):
    """The recorder's limiter eases down peaks above its ceiling, and the top is cut."""
    size, ceiling = SR // 50, .97  # 20 ms window; full scale is 1
    gain = np.minimum(1, ceiling / (np.abs(dry).max(axis=0) + 1e-9))
    gain = uniform_filter1d(minimum_filter1d(gain, size), size)
    top_cut = signal.ellip(8, .2, 70, TOP_HZ, fs=SR, output="sos")
    return signal.sosfilt(top_cut, dry * gain)


dry = scene()
out = record(dry)
int16_out(out)
```